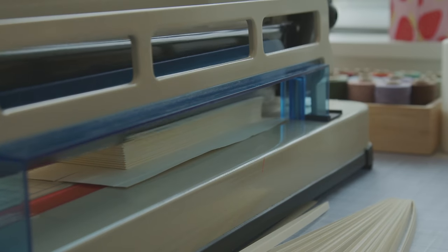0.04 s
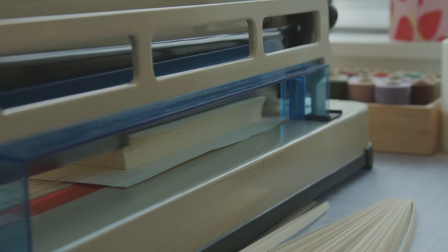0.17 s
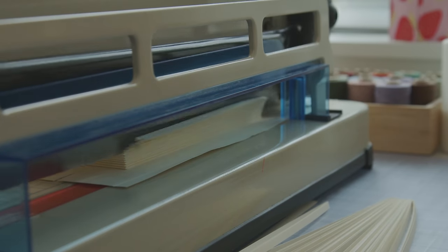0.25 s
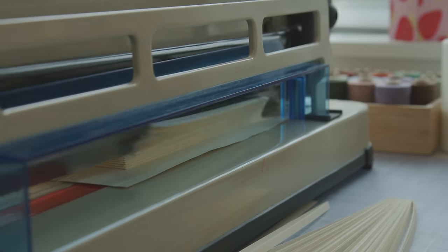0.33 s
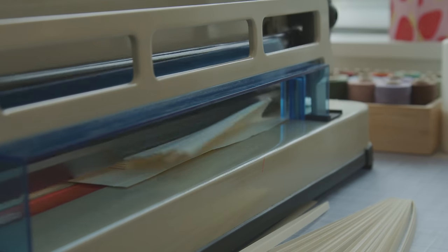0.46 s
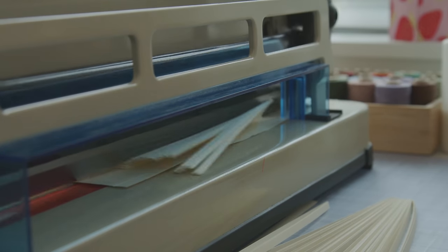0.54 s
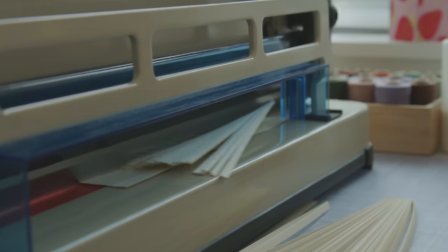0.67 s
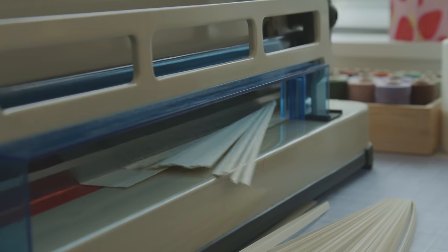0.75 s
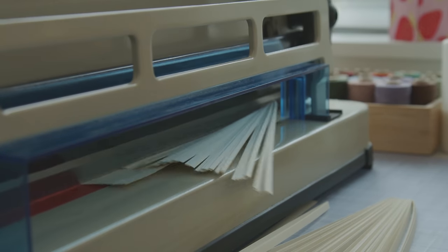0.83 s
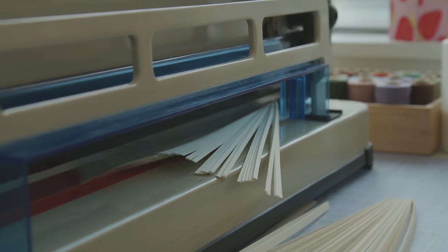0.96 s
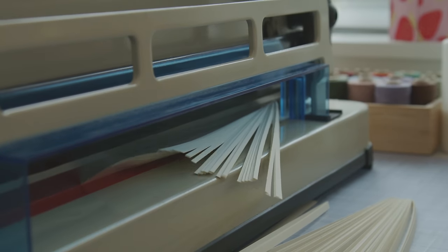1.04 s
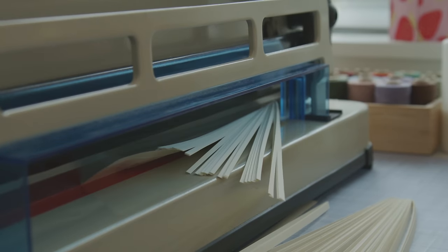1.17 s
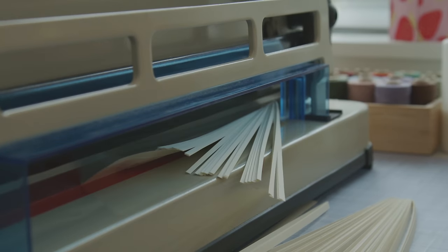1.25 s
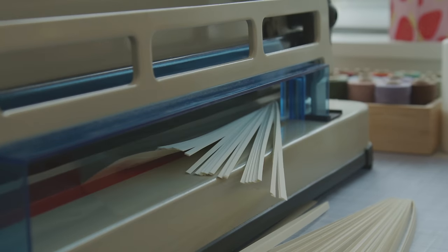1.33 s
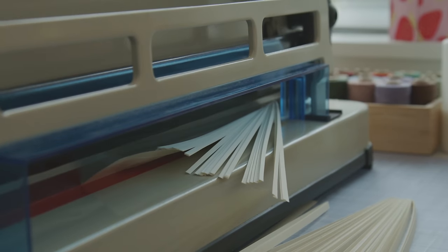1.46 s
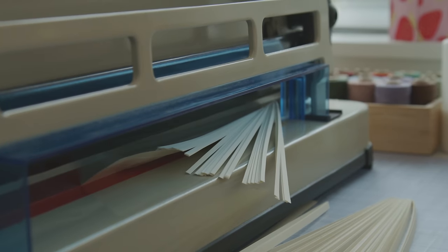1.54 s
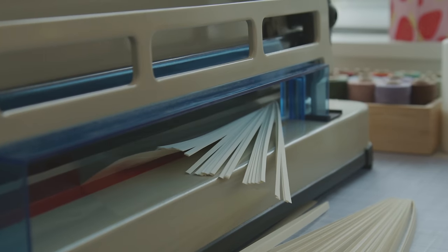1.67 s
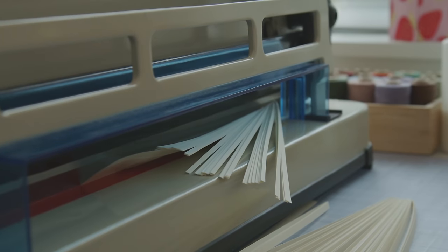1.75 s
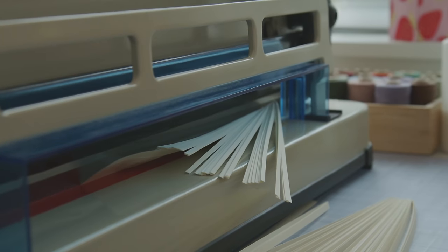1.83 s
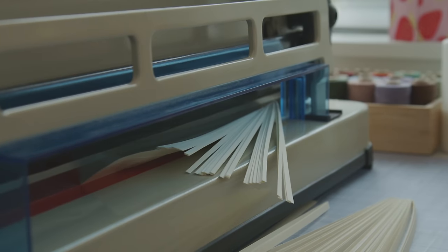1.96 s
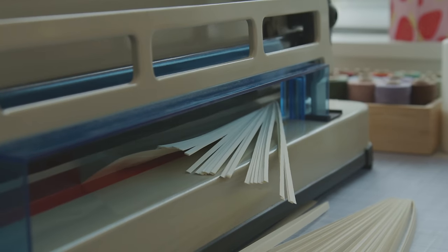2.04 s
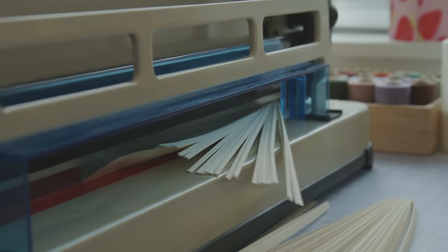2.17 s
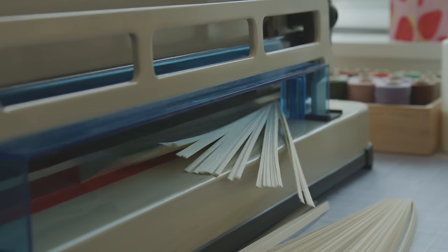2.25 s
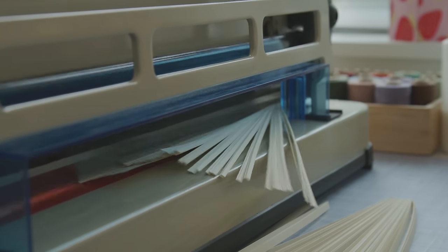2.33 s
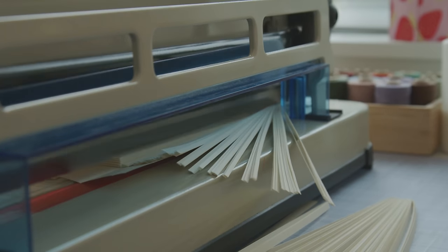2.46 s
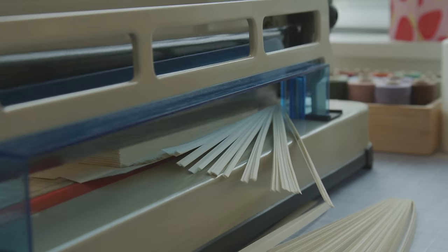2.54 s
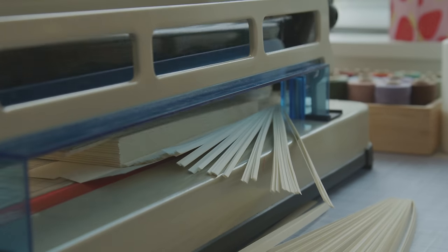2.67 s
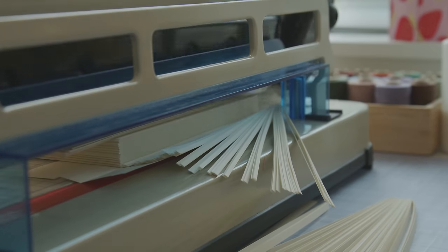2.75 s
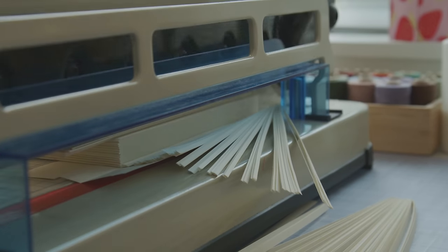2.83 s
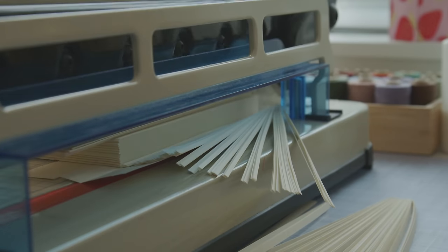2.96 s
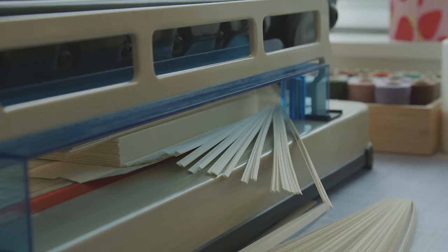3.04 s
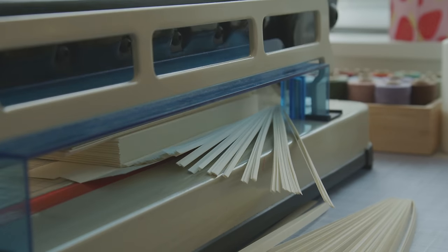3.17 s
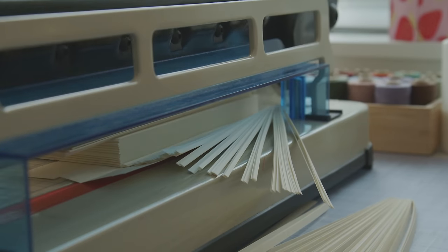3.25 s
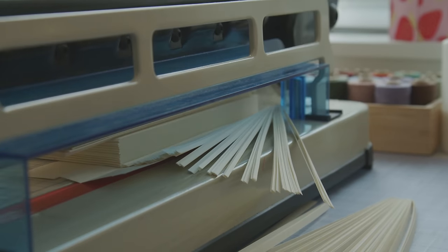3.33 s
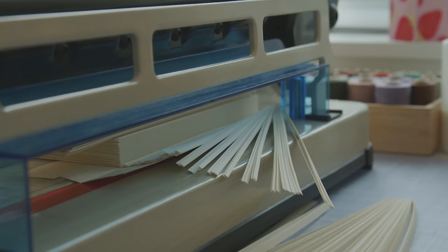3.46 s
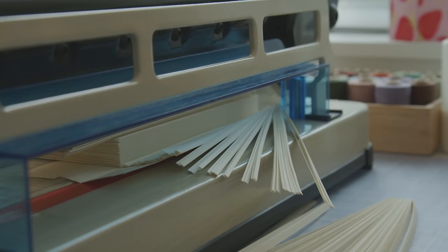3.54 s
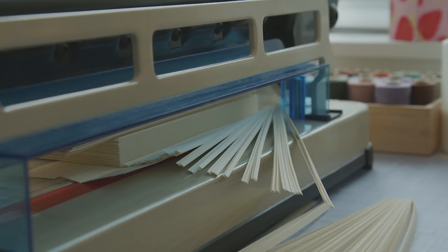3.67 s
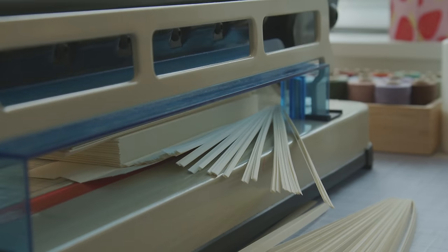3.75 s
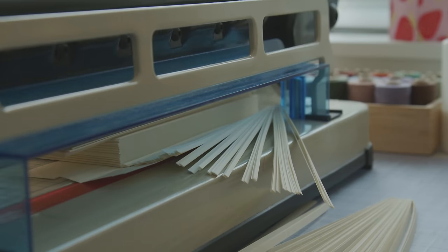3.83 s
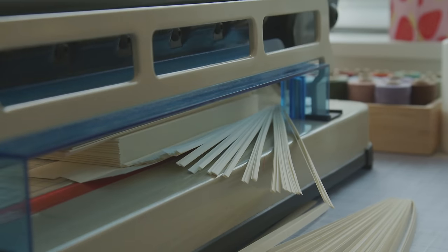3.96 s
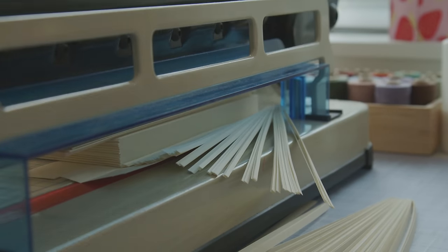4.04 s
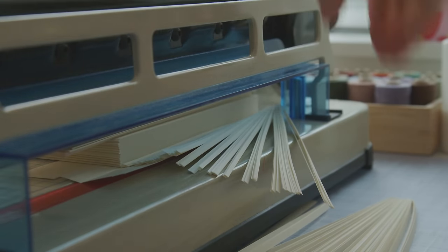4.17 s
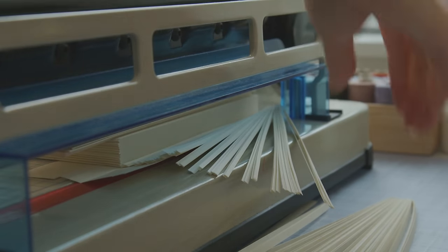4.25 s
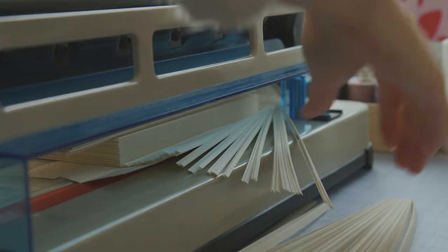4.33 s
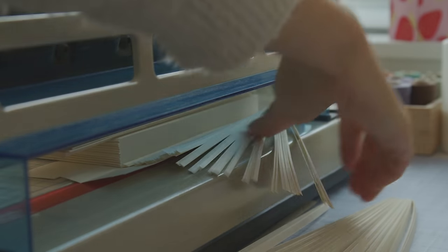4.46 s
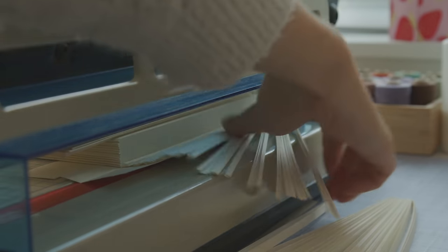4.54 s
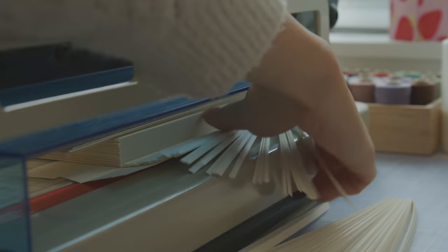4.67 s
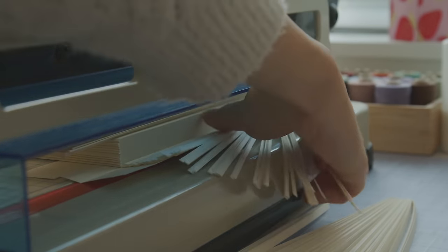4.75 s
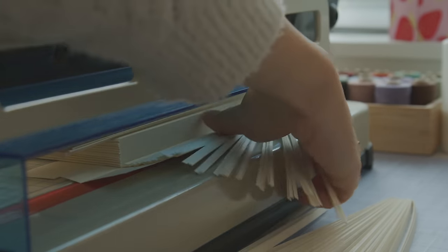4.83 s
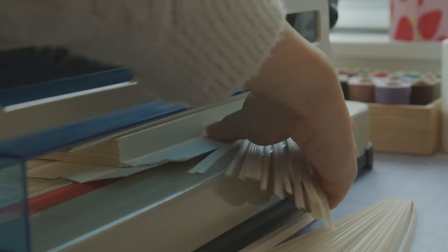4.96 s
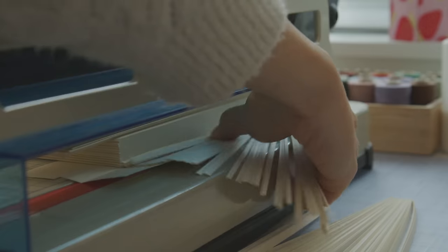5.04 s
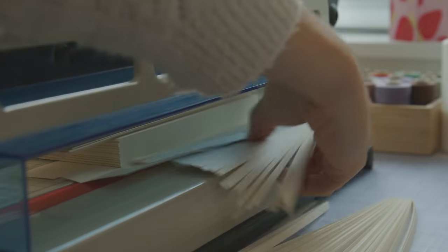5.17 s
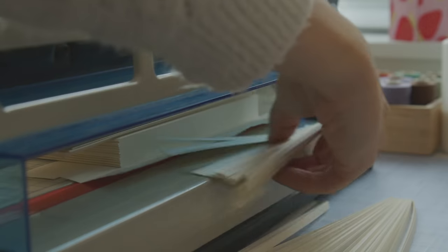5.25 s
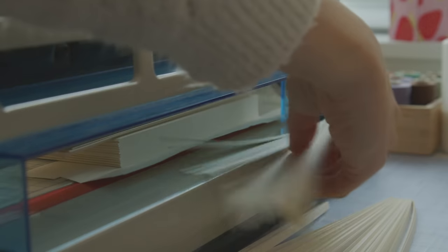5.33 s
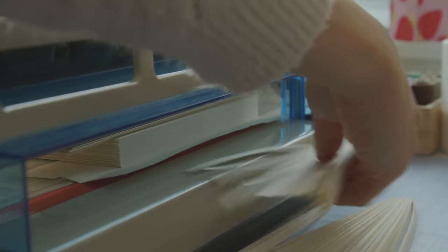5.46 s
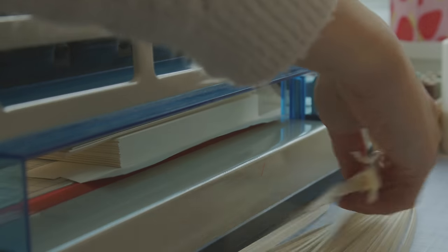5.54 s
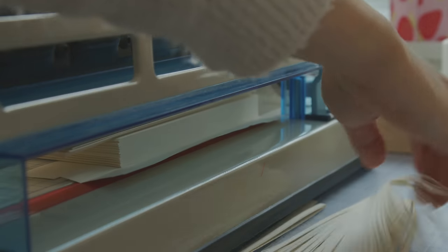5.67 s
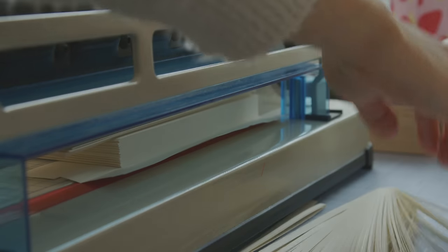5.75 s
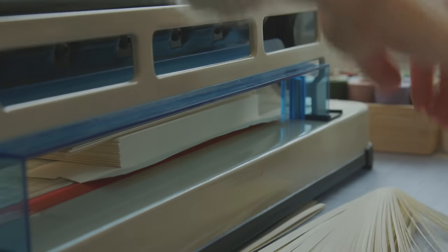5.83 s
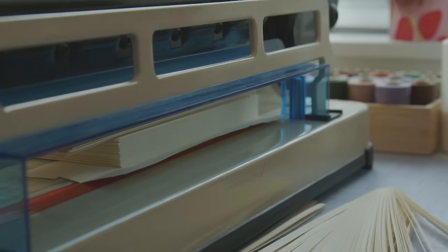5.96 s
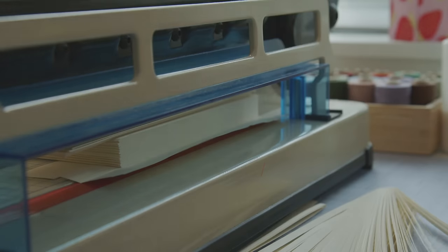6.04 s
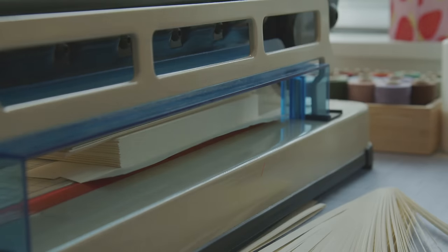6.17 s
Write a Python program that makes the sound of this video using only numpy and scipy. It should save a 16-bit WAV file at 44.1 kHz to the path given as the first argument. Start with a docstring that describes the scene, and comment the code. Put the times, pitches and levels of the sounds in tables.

```python
"""A small quiet room, one microphone near a lever guillotine on a table. First the blade shears a stack of paper:
countless fibres snap and shake the plastic housing, while the lever rubs in its guides and single sheets flick.
Then the lever clicks and thuds, the ratchet pawl ticks, a heavier thud follows, and the lever swings back until
the steel blade carrier clanks against its stop. Last, a hand knocks the guard, gathers the rustling offcuts and
drops them. Noise and random snaps through resonances make the rubs and blows; decaying sines make the rings."""
import sys
import numpy as np
from scipy import signal
from scipy.fft import rfft, irfft, next_fast_len
from scipy.io import wavfile
from scipy.ndimage import uniform_filter1d, map_coordinates

SR = 44100
rng = np.random.default_rng(int(sys.argv[2]) if len(sys.argv) > 2 else 0)


def int16_out(signal):
    """Quantize to a 16-bit WAV file."""
    q = np.round(np.clip(np.atleast_2d(signal).T, -1, 1) * 32767)
    wavfile.write(sys.argv[1], SR, q.astype(np.int16))


N = 273287
TOP_HZ = 15850  # upper limit of what the microphone picks up
T = np.arange(SR // 4) / SR  # time within one short blow, s
T_RING = np.arange(SR) / SR  # time within one ring, s


def amp(db):
    """Decibels to gain."""
    return 10 ** (np.asarray(db) / 20)


def unit(x):
    """Scale to rms 1."""
    return x / np.sqrt(np.mean(x ** 2) + 1e-20)


def crest(x):
    """Scale so that the loudest 4 ms have rms 1."""
    return x / np.sqrt(uniform_filter1d(x ** 2, size=176).max())


def along(points, hz):
    """Read (Hz, value) points on a log frequency axis."""
    f, v = np.transpose(points)
    return np.interp(np.log(hz + 1), np.log(f + 1), v)


def wobble(rate):
    """A smooth random curve, rate knots a second."""
    knots = rng.standard_normal(int(N * rate / SR) + 4)
    return map_coordinates(knots, [np.arange(N) * rate / SR])


def add(track, s, x):
    """Mix x into the track at time s."""
    part = track[round(s * SR):][:len(x)]
    part += x[:len(part)]


def colour(x, spectrum):
    """Causal minimum-phase filter with the given (Hz, dB) shape."""
    m = 2 * next_fast_len(len(x) // 2 + 4096)
    gain = amp(along(spectrum, np.fft.rfftfreq(m, 1 / SR)))
    cepstrum = irfft(np.log(gain + 1e-6))
    # folding the cepstrum forward in time makes the filter causal
    cepstrum[1:m // 2] *= 2
    cepstrum[m // 2 + 1:] = 0
    response = np.exp(rfft(cepstrum))
    return irfft(rfft(x, m) * response)[:len(x)]


def band(x, low_hz, high_hz):
    """Causal band-pass."""
    sos = signal.butter(4, [low_hz, min(high_hz, TOP_HZ)], "band", fs=SR, output="sos")
    return signal.sosfilt(sos, x)


def soften(x, corner_hz):
    """A softer contact loses what lies above its corner."""
    sos = signal.butter(2, min(corner_hz, TOP_HZ), fs=SR, output="sos")
    return signal.sosfilt(sos, x)


def snaps(rate, spread_db):
    """Random fibre snaps of uneven size and either sign, rate a second."""
    happens = rng.random(N) < rate / SR
    sign = rng.choice([-1, 1], N)
    size = amp(spread_db * np.clip(rng.standard_normal(N), -2, 2))
    return happens * sign * size


def contact(length, rise, t60):
    """A chattering contact that rises, lasts for its length and dies away."""
    onset = 1 - np.exp(-T / rise)
    decay = amp(-60 * np.maximum(T - length, 0) / t60)
    return rng.standard_normal(len(T)) * onset * decay


# a stroke is STROKE_DB down one rise before and one fall after its peak
STROKE_DB, STROKE_ROUNDNESS = 21, 1.19


def strokes(rows):
    """Gain per sample of rubbing strokes that each swell and fade; overlapping strokes add in power."""
    t, power = np.arange(N) / SR, np.zeros(N)
    for s, db, rise, fall in rows:
        away = np.maximum((s - t) / rise, (t - s) / fall)
        power += amp(db - STROKE_DB * np.minimum(away, 4) ** STROKE_ROUNDNESS) ** 2
    return np.sqrt(power)


SHRINK = 0.89  # length of each flight of a bouncing part over the one before


def bounces(s, db, flight, loss_db, count):
    """(s, dB) of the rebounds after time s, each sooner and weaker than the last."""
    k = np.arange(count)
    return zip(s + np.cumsum(flight * SHRINK ** k), db - loss_db * k)


# modes of the plastic housing: pitch_hz, width_hz, level_db
HOUSING_MODES = [(134, 14, -6), (280, 40, -3), (349, 24, -1), (444, 18, -2), (537, 20, -9), (647, 25, -11),
                 (795, 38, 0), (935, 35, -4), (978, 32, -2), (1075, 45, -1), (1266, 45, -8), (1410, 45, -4),
                 (1550, 40, -8), (1680, 28, -5), (1905, 34, -2), (2090, 60, -3), (2826, 25, -7),
                 (3220, 32, -6)]


def housing(x, direct):
    """The housing's resonances on top of a direct share."""
    m = next_fast_len(len(x) + 4096)
    f = np.fft.rfftfreq(m, 1 / SR)
    response = direct
    for hz, width, db in HOUSING_MODES:
        response = response + amp(db) * 1j * f * width / (hz * hz - f * f + 1j * f * width)
    return irfft(rfft(x, m) * response, m)[:len(x)]


# colour of the room's murmur: pitch_hz, level_db
HUSH_COLOUR = [(25, -49), (60, -22), (130, -6), (190, -7.5), (240, 1), (293, -3.5), (489, -7.5), (754, -6),
               (936, -12.5), (1480, -12), (2110, -16.5), (2280, -26.5), (3720, -21.5), (5430, -37),
               (7110, -32.5), (16000, -36)]


def hush():
    """The murmur of the room's air: coloured noise whose level drifts slightly."""
    return amp(-64.5) * unit(colour(rng.standard_normal(N), HUSH_COLOUR)) * amp(1.4 * wobble(4.54))


# force on the blade during the cut: time_s, gain_db
CUT_FORCE = [(0.0, -38.5), (0.01, -38), (0.224, -31.5), (0.55, -31.5), (0.584, -35), (0.618, -34),
             (0.746, -36.5), (0.868, -44.5), (0.9, -58)]


def force():
    """Gain of the force on the blade, which ends as the last sheet parts."""
    s, db = np.transpose(CUT_FORCE)
    return amp(np.interp(np.arange(N) / SR, s, db, right=-120))


# tearing as it crunches in the housing: pitch_hz, level_db
CRUNCH_COLOUR = [(110, -50.5), (180, -10), (272, -6), (317, -6), (348, -3), (613, -8.5), (771, -3.5),
                 (956, -4), (1180, -8), (1450, -11), (2430, -18.5), (2880, -19.5), (4160, -21), (5820, -32),
                 (7000, -44), (9100, -53), (15400, -120)]
# fibres hissing in the air: pitch_hz, level_db
FIBRE_COLOUR = [(3290, -23), (5600, -3), (8840, 1), (9440, -1.5), (11600, -3), (15100, -14.5), (16000, -56)]
# tearing as it rumbles in the table: pitch_hz, level_db
RUMBLE_COLOUR = [(26, -34), (45, -43), (59, -15), (102, -9), (124, -4.5), (184, 0.5), (209, -10),
                 (230, 8.5), (300, -50), (510, -120)]
CUT_S = 1  # time for the blade's depth to go from top sheet to table
# each voice under the force: (dB at the top sheet, change in dB down to the table)
RASP_DB, HISS_DB, RUMBLE_DB = (-13, -8.5), (-16.5, -4), (-30.5, 16.5)


def cut():
    """Sheets give way: snaps crunch in the housing, rasp on the blade, hiss in the air and rumble in the table.
    The deeper the blade, the duller the tearing and the more the table takes."""
    depth = np.minimum(np.arange(N) / SR / CUT_S, 1)
    rasp_gain, hiss_gain, rumble_gain = [
        amp(top_db + change_db * depth) for top_db, change_db in (RASP_DB, HISS_DB, RUMBLE_DB)]
    tearing = snaps(rate=2600, spread_db=1.5) * amp(0.6 * wobble(110))
    body = colour(housing(tearing, direct=0.44), CRUNCH_COLOUR)
    crunch = unit(band(body, low_hz=210, high_hz=2080))
    rasp = unit(band(body, low_hz=2600, high_hz=5850))
    hiss = unit(colour(tearing + 0.12 * rng.standard_normal(N), FIBRE_COLOUR))
    rumble = unit(band(colour(tearing, RUMBLE_COLOUR), low_hz=55, high_hz=260))
    voices = amp(-0.43) * crunch + rasp_gain * rasp + hiss_gain * hiss + rumble_gain * rumble
    return force() * voices


# the lever sliding in its guides: peak_s, level_db, rise_s, fall_s
LEVER_STROKES = [(1.0, -56, 1, 0.33), (2.21, -53.5, 0.24, 0.4), (2.72, -52.5, 0.55, 0.64),
                 (3.55, -56.5, 0.65, 0.34)]
# colour of the guides: pitch_hz, level_db
GUIDE_COLOUR = [(88, -39), (150, -13), (247, -17.5), (282, -19), (356, -1.5), (478, -10), (967, -10.5),
                (1980, -21.5), (2510, -27.5), (4320, -31), (5000, -37), (6500, -65), (11000, -120)]


def slide():
    """The lever rubs unevenly along its guides: flickering snaps through the housing."""
    friction = snaps(rate=760, spread_db=1) * amp(1.46 * wobble(24.08))
    return strokes(LEVER_STROKES) * unit(colour(housing(friction, direct=1.0), GUIDE_COLOUR))


# time each frequency takes to die in the room: pitch_hz, t60_s
ROOM_DECAY = [(150, 0.34), (500, 0.42), (2000, 0.3), (5000, 0.29), (14000, 0.2)]
# strength of the room's answer: pitch_hz, level_db
ROOM_ANSWER = [(100, -21.5), (350, -10), (1000, -15.5), (4000, -8.5), (14000, -13.5)]


def room(x):
    """The small room answers after 8 ms, each frequency dying at its own speed."""
    hz, t, z = signal.stft(rng.standard_normal(SR // 2), SR, nperseg=256)
    decay = amp(-60 * t / along(ROOM_DECAY, hz)[:, None])
    tail = signal.istft(z * decay, SR, nperseg=256)[1]
    delayed = np.pad(x, (round(.008 * SR), 0))
    answer = signal.fftconvolve(delayed, tail / np.linalg.norm(tail))[:N]
    return colour(answer, ROOM_ANSWER)


# colour of one flicking sheet: pitch_hz, level_db
SHEET_COLOUR = [(880, -31), (1500, -0.5), (2190, 2), (2410, -7.5), (4500, 6), (5660, -11), (7170, -2),
                (10100, -2.5), (11000, -2), (13800, -10.5), (16000, -10.5)]
TAP_DB = -10.5  # a sheet's tap on the housing relative to its flick, before half its brightness is taken off


def flick(length, bright_db):
    """A single sheet snaps, brighter the crisper its edge, and taps the housing."""
    snap = colour(contact(length, rise=0.0004, t60=0.029), SHEET_COLOUR)
    snap = crest(colour(snap, [(4500, 0), (9000, bright_db)]))
    shaken = housing(contact(length, rise=0.00022, t60=0.17), direct=0.94)
    tap = crest(band(shaken, low_hz=255, high_hz=1570))
    return snap + amp(TAP_DB - bright_db / 2) * tap


# sheets snapping, flicking and landing: start_s, level_db, length_s, brightness_db
SHEET_FLICKS = [(.178, -42, 0.0073, 4), (0.219, -42.5, 0.0068, 11), (0.481, -43.5, .0024, 9),
                (0.543, -34.5, 0.0034, 1), (0.737, -42.5, 0.0027, 4.5), (0.83, -47, 0.0026, 5),
                (0.861, -50, 0.0032, -1), (1.123, -60, 0.014, -2), (1.177, -53, 0.043, -6),
                (1.65, -45, 0.0015, 3.5), (4.548, -55, 0.0082, -5), (4.9402, -41, 0.0095, -0.5),
                (5.251, -45, 0.0092, -2), (5.276, -51, .003, -3), (5.43, -49.5, 0.013, -6),
                (5.619, -52.5, 0.0098, 3), (5.638, -46.5, 0.0078, 1), (5.7585, -41, 0.012, 9),
                (5.81, -52, 0.0042, 0)]


def flicks():
    """Single sheets snap, flick and land: short bursts of coloured noise."""
    out = np.zeros(N)
    for s, db, length, bright_db in SHEET_FLICKS:
        add(out, s, amp(db) * flick(length, bright_db))
    return out


# the blade brushing the face of the stack: peak_s, level_db (before the 3.5 dB cut below), rise_s, fall_s
BRUSH_STROKES = [(.97, -61.5, .08, 0.096), (1.14, -65.5, 0.089, 0.27), (2.23, -58.5, 0.068, 0.09),
                 (2.335, -53.5, 0.051, .12), (2.58, -67.5, 0.47, 0.49), (2.81, -50.5, 0.089, .1),
                 (2.895, -48, 0.22, 0.17), (3.21, -66.5, .2, .14), (3.775, -58, 0.085, 0.041),
                 (3.97, -72, 0.21, 0.24)]
# colour of the brushed stack: pitch_hz, level_db
STACK_COLOUR = [(1180, -16), (2000, 2), (2490, -34), (2830, 5.5), (3400, 0.5), (4300, 6), (5630, -4),
                (7980, 2), (13600, -7.5), (16000, -13)]


def brush():
    """The blade brushes the stack's face: a dense stream of uneven snaps."""
    grains = snaps(rate=15000, spread_db=6.5) * amp(0.66 * wobble(55))
    return amp(-3.5) * strokes(BRUSH_STROKES) * unit(colour(grains, STACK_COLOUR))


# how the housing carries a blow (mid, bass, edge, treble): low_hz, high_hz, rise_s, t60_s, level_db
PANEL_BANDS = [(556, 2030, 0.00077, 0.062, 1), (290, 426.6, 0.0007, 0.042, -6),
               (2600, 4870, 0.00041, 0.029, -5.5), (6370, 15000, 0.000067, 0.046, -4)]


def blow(hard_hz, length):
    """One blow on the housing: the treble starts most sharply, mid and bass swell a little more slowly;
    a soft blow is dull."""
    waves = np.zeros(len(T))
    for low_hz, high_hz, rise, t60, db in PANEL_BANDS:
        shaken = housing(contact(length, rise, t60), direct=0.59)
        waves += amp(db) * crest(band(shaken, low_hz, high_hz))
    return crest(soften(waves, hard_hz))


# blows on the housing: start_s, level_db, hardness_hz, contact_s
HOUSING_BLOWS = [(0.987, -44, 1280, 0.012), (1.1665, -34, 5140, 0.0066), (1.601, -60.5, 4560, .002),
                 (1.6497, -34, 2720, 0.0048), (2.196, -35, 9800, 0.0042), (2.21, -37, 1340, 0.0026),
                 (2.332, -38.5, 1880, 0.0046), (2.376, -34.5, 2850, .006), (2.385, -31.5, 1040, 0.0037),
                 (2.794, -44, 3830, .0024), (2.872, -49, 4000, .003), (3.328, -51.5, 220, 0.016),
                 (3.382, -46, 990, 0.041), (3.409, -36, 1040, .022), (3.4287, -27.5, 7000, 0.021),
                 (3.471, -36, 517, 0.012), (4.6699, -28.5, 5440, 0.013), (4.682, -25, 2520, 0.0048),
                 (4.725, -47, 1300, .006), (4.756, -46.5, 3000, .0025), (4.785, -47.5, 1290, 0.011),
                 (5.398, -56, 2600, 0.0062), (5.724, -51.5, 690, 0.024)]
# rattle: first flight (s), first loss (dB), later losses (dB), hardness kept (share)
RATTLE_S, RATTLE_DB, RATTLE_LOSS_DB, RATTLE_HARDNESS = 0.028, 13.5, 5.5, 0.39


def knocks():
    """Lever and hand strike the housing, and the loose guard rattles after each blow."""
    out = np.zeros(N)
    for s, db, hard_hz, length in HOUSING_BLOWS:
        add(out, s, amp(db) * blow(hard_hz, length))
        rattle = blow(RATTLE_HARDNESS * hard_hz, length)
        for when, level in bounces(s, db - RATTLE_DB, RATTLE_S, RATTLE_LOSS_DB, count=3):
            add(out, when, amp(level) * rattle)
    return out


# single notes that ring out from the blade, pawl, frame or guard: start_s, pitch_hz, level_db, t60_s
SINGLE_NOTES = [(.99, 1090, -41.5, .09), (2.334, 1075, -39, .12), (2.39, 571, -42, .7),
                (2.797, 960, -39, .05), (4.69, 795, -24.5, .07), (4.757, 1107, -46, .3),
                (4.94, 410, -53, .45)]


def single_notes():
    """Now and then the blade, pawl, frame or guard rings out on one note, a decaying sine."""
    out = np.zeros(N)
    for s, hz, db, t60 in SINGLE_NOTES:
        onset = 1 - np.exp(-T_RING / 0.0015)
        add(out, s, amp(db - 60 * T_RING / t60) * np.sin(2 * np.pi * hz * T_RING) * onset)
    return out


# the lever bumping its buffer: start_s, level_db
LEVER_BUMPS = [(1.052, -51), (1.416, -57), (1.475, -61), (2.38, -20.5)]
# modes of the buffer and its mount: pitch_hz, level_db, t60_s
BUFFER_MODES = [(290, -7, 0.036), (375, 7, 0.019), (604, -8, 0.026), (945, -9.5, 0.049)]
BUMP_S, BUMP_DB, BUMP_LOSS_DB = 0.019, 12, 4  # its bounces: first flight, first loss, later losses


def thuds():
    """The lever bounces on its rubber buffer: a few heavily damped modes, too small to radiate deep bass."""
    out = np.zeros(N)
    push = sum(amp(level - 60 * T / t60) * np.sin(2 * np.pi * hz * T) for hz, level, t60 in BUFFER_MODES)
    thud = crest(band(push * (1 - np.exp(-T / 0.0048)), low_hz=237, high_hz=1460))
    for s, db in LEVER_BUMPS:
        rebounds = bounces(s, db - BUMP_DB, BUMP_S, BUMP_LOSS_DB, count=3)
        for when, level in [(s, db), *rebounds]:
            add(out, when, amp(level) * thud)
    return out


# colour of one ratchet tooth: pitch_hz, level_db
TOOTH_COLOUR = [(30, -64), (150, -20), (400, -11), (700, -13), (860, 7), (1080, 2), (1250, -13.5),
                (1600, -8.5), (2250, -17), (2700, -28.5), (4500, -39), (9000, -85)]


def tick(hard_hz):
    """The pawl's short hollow tick, an impulse with a faint chatter."""
    drop = (T == 0) + amp(-23) * contact(length=0.002, rise=0.0008, t60=0.05)
    return crest(soften(colour(drop, TOOTH_COLOUR), hard_hz))


# the pawl dropping over its teeth: start_s, level_db, hardness_hz, spring_ping_db, rebound_after_s
PAWL_DROPS = [(1.901, -36, 3000, -76.5, 0.032), (2.005, -37, 3000, -83, 0.037),
              (2.1023, -34.5, 3200, -65, .029)]
PAWL_REBOUND_DB, PAWL_REBOUND_HZ = -8.5, 1250  # it falls back once: relative level, softer hardness


def ratchet():
    """At each tooth the pawl ticks, plucks its spring and rebounds once."""
    out = np.zeros(N)
    spring = np.sin(2 * np.pi * 6565 * T) * amp(-60 * T / .11)
    for s, db, hard_hz, ping_db, flight in PAWL_DROPS:
        add(out, s, amp(db) * tick(hard_hz) + amp(ping_db) * spring)
        add(out, s + flight, amp(db + PAWL_REBOUND_DB) * tick(PAWL_REBOUND_HZ))
    return out


# jolts of the blade at its end stops: start_s, ring_db, hardness_hz, table_thump_db, shake_s
BLADE_JOLTS = [(2.384, -40.5, 623, -56, 0.0052), (3.431, -30, 14000, -62, 0.113)]
# modes of the blade and its carrier: pitch_hz, level_db, t60_s
BLADE_MODES = [(240, -13.5, 1.1), (409, -13, .32), (571, -8.5, .85), (960, -2, .16), (1082, -6, .3),
               (1303, -8, .25), (1680, -10, .3), (1900, -4, .26), (3047, -11, .2), (3219, -14, .24),
               (4025, -1, .16), (4048, -3, .28), (7843, -22, .42), (10050, -19, .22), (11200, -5, .09)]


def blade():
    """The steel rings after each end stop and shakes the table; a soft stop wakes only its low modes."""
    out = np.zeros(N)
    for s, db, hard_hz, table_db, length in BLADE_JOLTS:
        ring = np.zeros(len(T_RING))
        for hz, level, t60 in BLADE_MODES:
            woken = 1 / (1 + (hz / hard_hz) ** 4)
            tone = np.sin(2 * np.pi * (hz * T_RING + rng.random()))
            ring += woken * amp(level - 60 * T_RING / t60) * tone
        add(out, s, amp(db) * ring * (1 - np.exp(-T_RING / 0.004)))
        thump = band(contact(length, rise=0.0017, t60=0.23), low_hz=63.4, high_hz=157)
        add(out, s, amp(table_db) * crest(thump))
    return out


# offcuts sliding on each other: peak_s, level_db, rise_s, fall_s
OFFCUT_STROKES = [(4.555, -51.5, 0.014, 0.062), (4.66, -57.5, 0.11, .03), (4.955, -49, 0.011, 0.037),
                  (5.195, -46.5, 0.24, 0.23), (5.77, -58.5, 0.13, 0.17)]
# colour of rustling paper: pitch_hz, level_db
PAPER_COLOUR = [(150, -52), (590, -12.5), (1000, -9.5), (1420, -6), (1690, 0), (1960, -11), (2180, -5.5),
                (2560, -14), (3010, -4), (4470, 1), (5830, -13.5), (7620, -6), (12100, -11.5), (16000, -22)]


def rustle():
    """Offcuts rub on each other in clumps of tiny grains."""
    grains = snaps(rate=5700, spread_db=0.0) * amp(2.1 * wobble(69))
    return strokes(OFFCUT_STROKES) * unit(colour(grains, PAPER_COLOUR))


def scene():
    """Cutter and paper with the room's answer; the blade and the single notes come direct, without it."""
    near = cut() + slide() + flicks() + brush() + knocks() + thuds() + ratchet() + rustle()
    return (near + blade() + single_notes() + room(near) + hush())[None]


def record(dry):
    """The microphone keeps nothing above its band limit."""
    m = next_fast_len(N + SR // 4)
    kept = np.fft.rfftfreq(m, 1 / SR) < TOP_HZ
    return irfft(rfft(dry, m) * kept, m)[..., :N]


dry = scene()
out = record(dry)
int16_out(out)
```